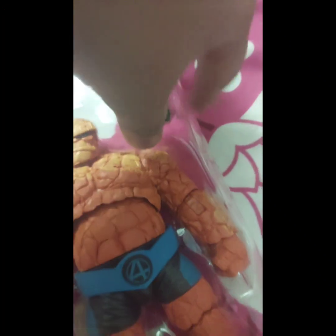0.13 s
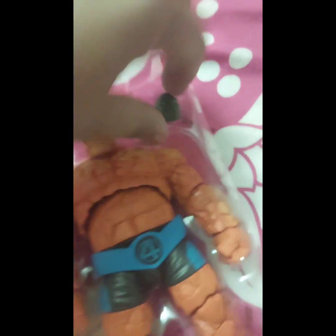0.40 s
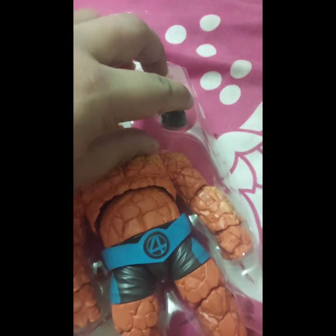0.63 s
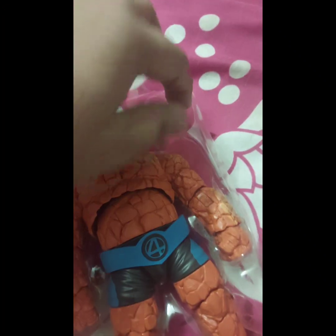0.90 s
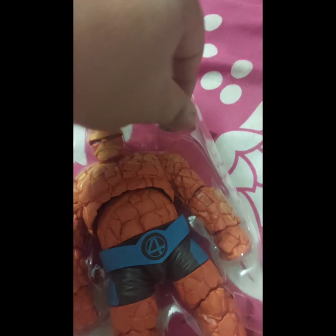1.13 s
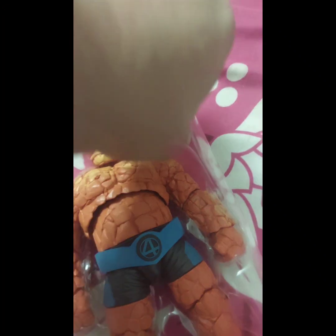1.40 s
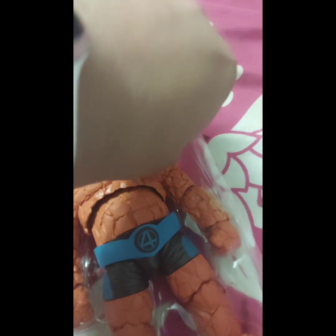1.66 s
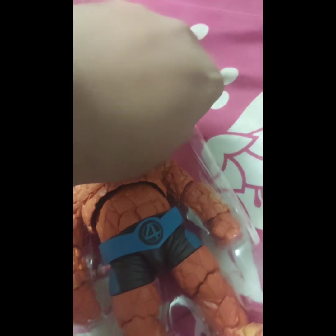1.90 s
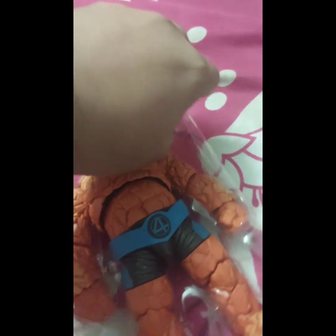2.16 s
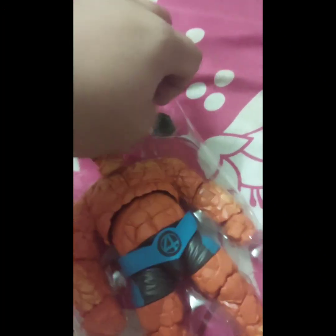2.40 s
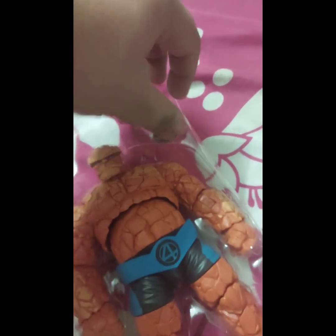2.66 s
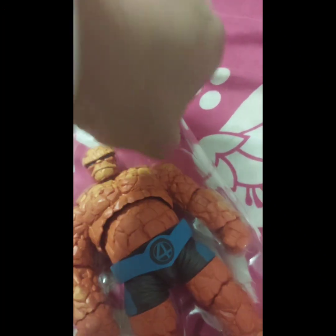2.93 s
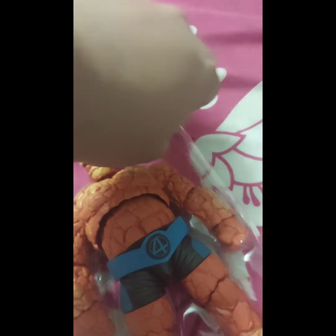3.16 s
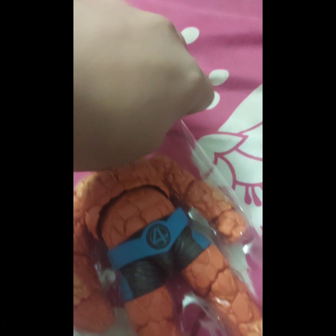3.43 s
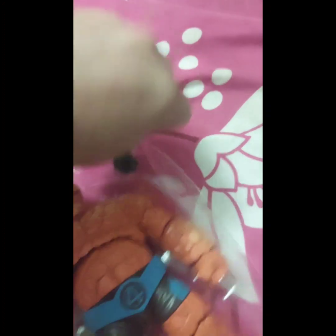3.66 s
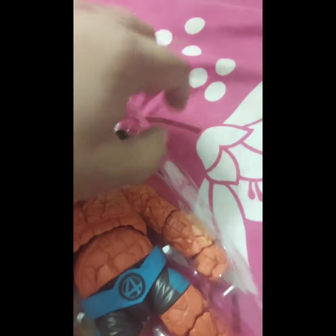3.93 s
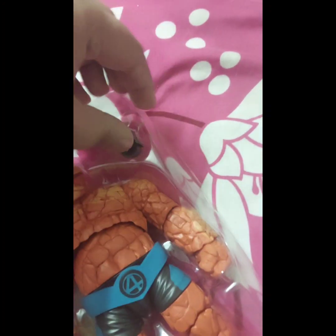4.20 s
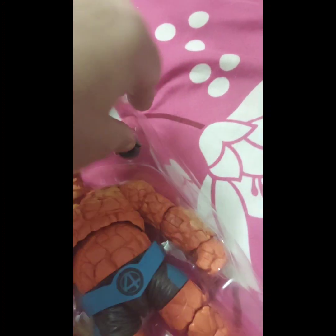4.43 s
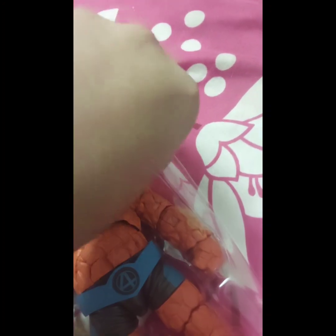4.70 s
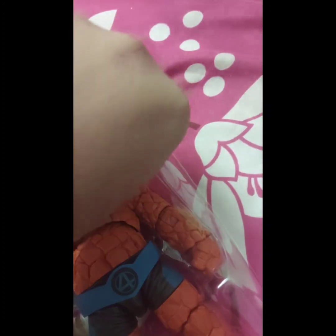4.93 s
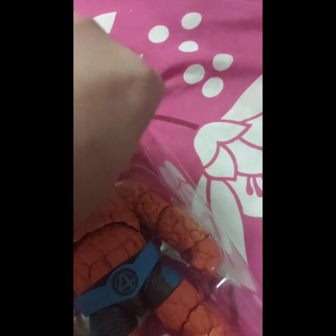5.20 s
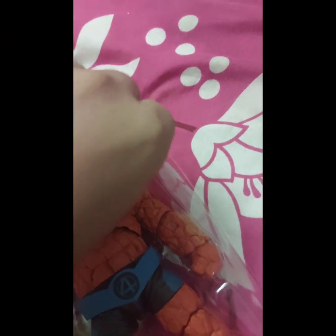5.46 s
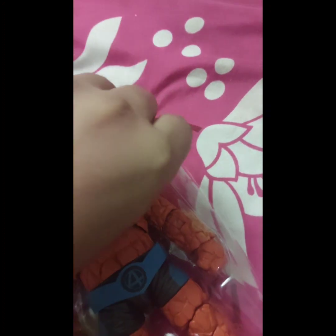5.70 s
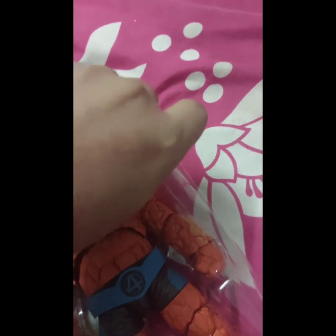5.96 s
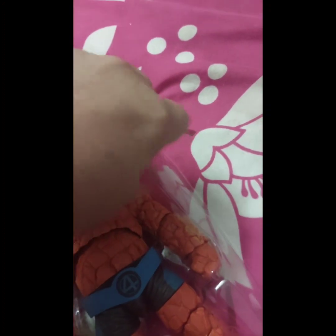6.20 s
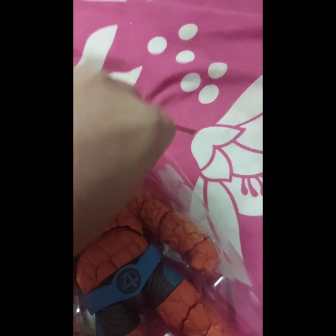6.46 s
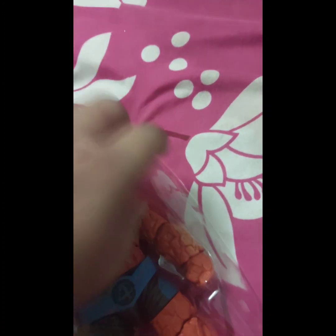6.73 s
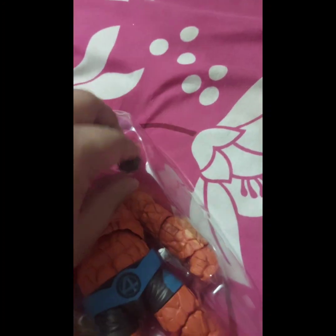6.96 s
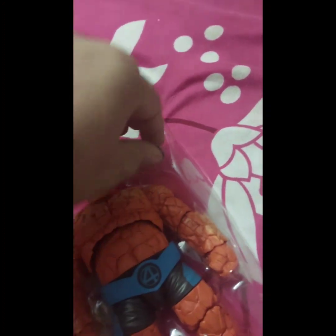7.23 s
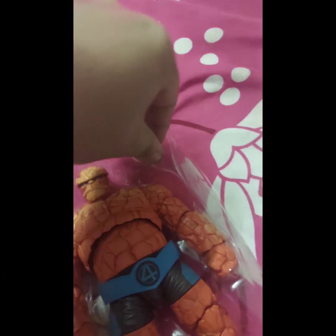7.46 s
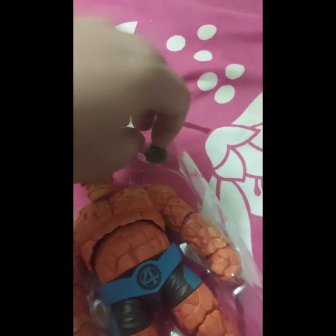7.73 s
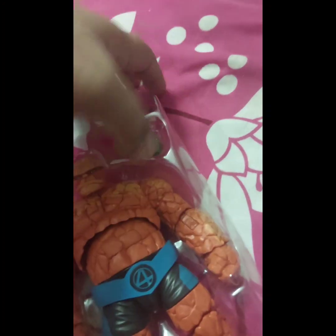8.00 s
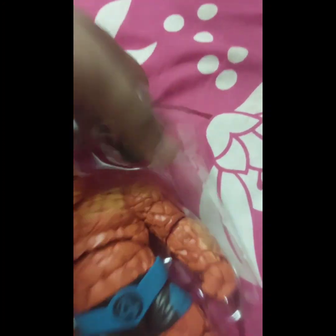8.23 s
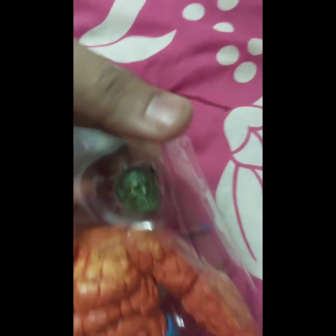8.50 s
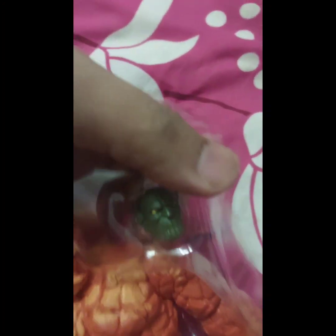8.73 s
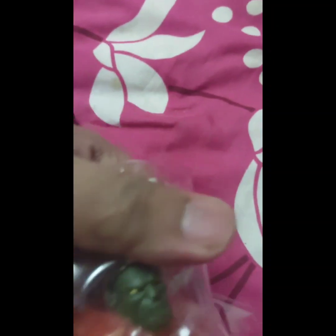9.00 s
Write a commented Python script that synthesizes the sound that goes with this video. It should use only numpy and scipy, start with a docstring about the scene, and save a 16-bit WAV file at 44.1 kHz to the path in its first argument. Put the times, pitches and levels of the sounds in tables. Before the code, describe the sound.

A close microphone in a small furnished room picks up fingers bending a thin plastic tray over about nine seconds. A sharp double snap opens, with lighter clicks and another pop at 0.6, then it is sparse until 1.4. From 1.4 to 2.4 comes a dense, loud run of hollow pops and bright cracks. A short creak rises around 2.9 to 3.0, followed by rapid crinkling until a strong snap at 3.7. From about 3.9 to 5.6 it is nearly quiet: soft room hum, low air puffs, a few faint ticks and a very faint far whine sinking between 4 and 5. Moderate crackling returns from 5.65 to 6.15, then scattered snaps, weak creaks after 7.3 and bright ticks near 7.7. A strong snap at 8.2 leads into duller, heavier crunches, loudest around 8.45 and 8.9 to 9.1. Room reflections are short.

```python
"""In a furnished room, fingers work a small part out of a thin plastic tray close to a small microphone.
The tray snaps, crunches and creaks (dying sines and noise bursts) over a finer random crackle.
Filtered noise makes the draught buffeting the microphone and the soft hum of the room.
A faint far whine, one wavering sine, sinks in pitch; echoes and a noise tail place the tray in the room."""
import sys
import numpy as np
from scipy import signal
from scipy.fft import rfft, irfft, next_fast_len
from scipy.io import wavfile
from scipy.ndimage import uniform_filter1d

SR = 44100
rng = np.random.default_rng(int(sys.argv[2]) if len(sys.argv) > 2 else 0)


def voltage_ratio(decibels):
    """Convert decibels (scalar or array-like) to amplitude ratios, 20 dB per decade."""
    exponent = np.asarray(decibels, float) / 20
    return 10 ** exponent


def to_wav(sig):
    """Store sig (one row per channel, or 1-D mono) as 16-bit WAV at the path in sys.argv[1].

    Samples outside -1..1 are clipped; the rate is SR.
    """
    pcm = np.clip(np.atleast_2d(sig), -1, 1) * 32767
    pcm = np.round(pcm).astype(np.int16)
    wavfile.write(sys.argv[1], SR, pcm.T)  # frames by channels


N = 402191  # length in samples, about 9.1 s

# Steady murmur of the room, spectrum shape: [pitch_hz, relative_level_db_per_hz]
HUM_SPECTRUM = [(100, -38), (160, 0), (315, -10.5), (475, 5), (650, -7.5), (1000, -2.5), (1900, -15),
                (3100, -25.5), (6000, -35), (10000, -35.5), (12500, -40.5), (16000, -71)]
# Air rushing over the microphone, spectrum shape: [pitch_hz, relative_level_db_per_hz]
DRAUGHT_SPECTRUM = [(12, -18), (20, -6), (75, -1.5), (244, -16), (393, -23.5), (440, -21), (484, -27),
                    (900, -37.5), (1170, -59), (1980, -120)]
# Puffs of air, each holding its level for its length: [start_s, length_s, level_db]
PUFFS = [(0.0, 0.03, -47), (0.187, 0.073, -45), (0.484, 0.062, -34), (0.689, 0.14, -27.5),
         (1.44, 0.32, -34.5), (1.94, 0.18, -42), (2.326, 0.13, -38.5), (2.962, 0.069, -40.5),
         (3.234, 0.19, -37.5), (3.708, 0.12, -43.5), (4.113, 0.064, -45.5), (4.476, 0.13, -34),
         (5.004, 0.11, -45.5), (5.385, 0.18, -40.5), (6.073, 0.14, -34.5), (6.326, 0.17, -33.5),
         (7.196, .44, -40), (7.753, 0.033, -37.5), (8.154, 0.095, -49), (8.603, 0.038, -40.5),
         (8.876, 0.091, -44.5)]
# Ringing of a buckling patch of tray: [multiple_of_patch_pitch, level_db, t60_s]
PATCH_MODES = [(.5, -3.5, 0.016), (.75, -9.5, 0.014), (1.01, 7.5, 0.011), (1.28, -12.5, 0.035),
               (1.62, -12, 0.027), (2.05, -23, 0.036)]
# Stiff rims of the tray; snap() plays them at 0.9 of this pitch: [table_pitch_hz, level_db, t60_s]
RIM_MODES = [(2586, 9, 0.0025), (3316, -0.5, 0.0036), (3574, -3, 0.008), (4136, -1, 0.0036)]
# Colour of the noise as a crease flips: [pitch_hz, level_db]
CRACK_SPECTRUM = [(4200, 1), (5800, 3), (7200, 5), (8800, 6), (10500, 2), (13000, -2), (15700, -2),
                  (16300, -43)]
# How hard the fingers knead; crackle() also fades both levels at rest:
# [time_s, dull_crackle_db, bright_crackle_db]
KNEADING = [(0.0, -53, -76), (1.3, -62.5, -76), (1.6, -52, -51), (1.85, -62.5, -66.5), (2.74, -38.5, -81.5),
            (2.94, -56, -63), (3.12, -75, -80), (3.68, -54, -67), (3.94, -62, -74.5), (5.61, -56.5, -78),
            (5.94, -57, -62), (6.32, -52, -77.5), (7.85, -56.5, -64.5), (7.97, -91, -101),
            (8.26, -37.5, -73), (8.43, -45, -75), (8.6, -40, -61), (8.75, -56, -78), (8.84, -48, -70),
            (9.12, -24.5, -80.5)]
# Single reflections from the nearest surfaces: [delay_s, level_db]
ECHOES = [(.0075, -19.5), (0.0137, -21), (0.022, -26)]
# How long the room tail lasts in each band: [pitch_hz, t60_s]
ROOM_DECAY = [(250, 0.48), (600, 0.16), (1400, 0.23), (3700, 0.29), (9700, 0.26), (15000, 0.39)]
# Colour of the room tail: [pitch_hz, level_db]
ROOM_COLOUR = [(250, 8.5), (1000, 0.5), (2500, 5.5), (6000, 8), (12000, 3)]
# Quick snaps of the tray, peak levels: [start_s, patch_pitch_hz, patch_db, crack_db]
SNAPS = [(.015, 1053, -12, -22.5), (.017, 1945, -13, -37), (0.127, 915, -27, -49),
         (.222, 1540, -30.5, -39.5), (.451, 1530, -31, -35), (0.471, 1190, -28, -42),
         (0.598, 1026, -15, -29.5), (1.231, 1100, -29, -38), (1.382, 1100, -32.5, -38.5),
         (1.424, 870, -25.5, -29), (1.447, 1070, -19, -32.5), (1.462, 1420, -20, -37),
         (1.48, 1100, -17, -27.5), (1.508, 1020, -24, -51), (1.514, 1130, -34, -31),
         (1.521, 1110, -15, -26.5), (1.546, 1110, -41, -28), (1.556, 1110, -9.5, -25),
         (1.579, 1230, -27, -31), (1.584, 1430, -14, -26), (1.603, 1336, -10.5, -23.5),
         (1.636, 1050, -13, -31), (1.642, 1360, -9, -25.5), (1.688, 1230, -8.5, -22.5),
         (1.724, 1250, -29, -37), (1.733, 1350, -3, -20.5), (1.767, 1490, -47, -33),
         (1.844, 1450, -27.5, -40.5), (1.901, 1466, -5.5, -18.5), (2.058, 1036, -12, -37),
         (2.078, 1287, -9.5, -14), (2.186, 930, -25, -30.5), (2.288, 1130, -37, -37),
         (2.301, 1504, -5.5, -19), (2.391, 860, -6, -11), (2.593, 1810, -25.5, -31), (2.68, 550, -43, -36),
         (2.814, 1290, -22.5, -18.5), (2.846, 1280, -11.5, -33), (2.895, 1350, -23.5, -39),
         (3.057, 1776, -7, -20.5), (3.074, 1290, -11, -23), (3.088, 1380, -9, -21), (3.114, 1280, -12, -22),
         (3.157, 1420, -16.5, -25.5), (3.203, 930, -18.5, -48), (3.228, 1156, -16, -22.5),
         (3.27, 1010, -25, -30.5), (3.284, 1030, -22, -36), (3.302, 1050, -24, -30.5),
         (3.352, 1554, -13, -27), (3.373, 1050, -22, -27.5), (3.409, 1410, -23, -64),
         (3.423, 997, -9.5, -32.5), (3.464, 1370, -41, -34), (3.472, 1330, -19.5, -24.5),
         (3.501, 1330, -26, -31), (3.52, 1302, -13.5, -31), (3.58, 1210, -27, -33), (3.609, 1330, -24, -31),
         (3.637, 1950, -24.5, -34.5), (3.687, 1600, -9, -21), (3.695, 1220, -1.5, -11.5),
         (3.746, 880, -15.5, -24.5), (3.832, 970, -16.5, -30.5), (4.487, 572, -49, -43.5),
         (4.501, 426, -43, -48), (4.868, 1060, -42, -54), (5.101, 875, -38, -41),
         (5.651, 1040, -16.5, -37.5), (5.683, 940, -27, -50), (5.706, 1130, -26, -50),
         (5.712, 1250, -18, -26), (5.745, 1310, -19, -29), (5.759, 1330, -35, -43), (5.775, 1225, -18, -42),
         (5.838, 950, -12.5, -27), (5.866, 1500, -17.5, -42), (5.877, 1270, -36, -37),
         (5.92, 1230, -27.5, -40), (5.968, 1310, -23.5, -34), (5.988, 1240, -24, -34),
         (6.002, 1380, -28, -48), (6.061, 1780, -17.5, -32.5), (6.079, 1410, -13, -28.5),
         (6.119, 1690, -13, -28.5), (6.326, 1750, -21, -29), (6.719, 1430, -14, -29),
         (6.728, 750, -15.5, -20.5), (6.866, 1000, -30, -39), (6.915, 930, -23, -32.5),
         (6.949, 380, -28.5, -58), (7.039, 474, -34, -38.5), (7.113, 1290, -32, -57),
         (7.192, 840, -28, -46), (7.226, 740, -32, -43), (7.365, 880, -30.5, -44), (7.535, 1170, -40, -54),
         (7.666, 1250, -20, -28.5), (7.786, 1560, -27, -33), (7.795, 920, -23.5, -34.5),
         (7.836, 900, -30, -44), (7.936, 980, -13, -34.5), (7.971, 850, -18, -30.5), (8.218, 1023, -8, -18),
         (8.291, 517, -26.5, -38), (8.465, 926, -5, -17), (8.539, 1110, -31, -30), (8.549, 1030, -28, -24),
         (8.817, 900, -28.5, -25), (8.834, 474, -26.5, -22.5), (8.988, 666, -28, -18),
         (8.999, 860, -18, -18), (9.086, 810, -10, -22.5)]
# Slow crunches, a crease tearing open, peak levels:
# [start_s, length_ms, patch_pitch_hz, patch_db, crack_db]
CRUNCHES = [(0.398, 28, 640, -31.5, -40), (.421, 7.3, 1100, -25.5, -41), (.935, 9.4, 906, -25.5, -42.5),
            (1.249, 11.7, 1180, -30, -37), (1.914, 12, 2240, -23.5, -52), (2.033, 7.3, 515, -28, -39.5),
            (2.328, 9.7, 884, -9, -21), (2.409, 26, 1080, -13, -18.5), (2.541, 9, 1360, -31.5, -42.5),
            (2.745, 6.76, 956, -11, -25.5), (3.711, 21.7, 1340, -16.5, -30), (3.722, 12.2, 1100, -15, -52),
            (3.772, 12, 1000, -18.5, -30), (6.096, 15, 1280, -16, -35), (6.137, 11.2, 1220, -16, -31),
            (6.649, 4.8, 1050, -21, -28.5), (6.764, 6.6, 1030, -22, -29.5), (6.895, 14.4, 1360, -26, -38),
            (7.632, 5.9, 1278, -25.5, -39), (8.334, 9.1, 960, -22.5, -44), (8.405, 8.2, 800, -26.5, -47),
            (8.444, 15, 587, -25, -32), (8.456, 9, 810, -14, -26.5), (8.475, 18.4, 895, -14.5, -30.5),
            (8.593, 9.2, 1800, -29, -29.5), (8.619, 22, 970, -26, -31.5), (8.676, 26, 797, -21, -45),
            (8.865, 16.3, 805, -14.5, -26.5), (8.883, 8, 900, -25, -32), (8.915, 10.2, 630, -14, -19),
            (8.948, 10.6, 750, -6.5, -18.5), (9.028, 7.1, 748, -7, -21)]
# Bright ticks of the film alone, no patch, peak level: [start_s, crack_db]
TICKS = [(.393, -43), (.577, -38), (0.916, -47), (1.258, -40), (1.372, -41), (2.958, -30), (4.475, -47),
         (4.768, -46), (5.115, -37.5), (5.815, -43), (5.898, -35), (6.027, -36), (7.586, -44), (7.65, -28),
         (7.681, -23.5), (7.701, -26.5), (8.379, -42), (8.392, -34), (8.413, -42), (8.686, -29.5),
         (8.73, -31.5), (8.801, -25.5), (8.974, -17.5)]
# Where the tray is gripped sets how the rims join in; the favoured pitch is on the RIM_MODES scale:
# [time_s, rim_over_crack_db, favoured_rim_pitch_hz]
GRIP = [(0.0, -4.5, 2670), (1.45, -5.5, 2530), (1.55, 10, 2450), (2.4, 4, 2920), (2.85, -0.5, 3400),
        (3.6, 4.5, 3060), (5.7, -1, 3300), (6.14, 1, 3440), (6.33, 6.5, 3320), (6.65, 1.5, 2940),
        (7.95, -1.5, 3000), (8.3, -1.5, 4070), (8.75, -7, 3320), (9.12, 5.5, 2620)]
# Creaks, the part rubbing step by step along its pocket:
# [first_step_s, last_step_s, steps_per_s, patch_pitch_hz, first_patch_db, last_patch_db, rim_over_patch_db]
CREAKS = [(2.915, 3.033, 97, 1280, -28, -12, -11), (3.534, 3.556, 83, 1400, -15.5, -32, -6),
          (5.929, 5.956, 120, 1278, -30, -29.5, -12), (7.33, 7.354, 80, 1530, -44, -38.5, -14),
          (7.556, 7.607, 57, 1490, -37.5, -34.5, -21), (7.72, 7.762, 52, 1750, -32, -39, -3)]
# Far whine, sinking in uneven steps: [time_s, pitch_hz, level_db]
WHINE = [(4.02, 776, -74), (4.07, 775, -56), (4.14, 772, -61), (4.19, 746, -63), (4.44, 742, -61),
         (4.55, 716, -70), (4.75, 712, -61.5), (4.9, 709, -61), (5.0, 706, -74)]

HUM_DB = -54
CALM_DB, PUFF_RISE_DB_PER_S, PUFF_FALL_DB_PER_S = -53.5, 167, 211
RIM_FALL_DB_PER_OCTAVE = 13.5  # how fast rims fade away from the favoured pitch
ROOM_DB, ROOM_GAP_S = -13, 0.0064  # level of the tail; time before the walls answer
SNAP_MS, SNAP_SPREAD = 4.3, .25  # time a quick crease takes to let go; its relative scatter
CREAK_UNEVEN_DB, CREAK_JITTER_S, CREAK_DETUNE = 1.8, .0005, .02  # scatter from step to step
CREAK_STEP_MS, CREAK_CRACK_DB = 3.2, -10.5  # time a step takes; crack relative to the patch
CEILING = .93  # amplitude that rounded peaks approach
PORT_HZ, EDGE_HZ = 36.8, 16150  # low cut of the microphone; upper band limit


def evened(x):
    """Scales a sound to rms 1."""
    return x / np.sqrt(np.mean(x ** 2) + 1e-20)


def read(points, hz):
    """Reads a table over pitch, with straight lines on a log-frequency axis."""
    f, value = np.transpose(points)
    return np.interp(np.log(hz + 1), np.log(f + 1), value)


def coloured(x, points):
    """Filters a sound by a spectrum given in dB."""
    size = next_fast_len(len(x))
    gain = voltage_ratio(read(points, np.fft.rfftfreq(size, 1 / SR)))
    return irfft(rfft(x, size) * gain, size)[:len(x)]


def curve(rows):
    """Turns the columns of a timed table into values for every sample."""
    s, *columns = np.transpose(rows)
    return [np.interp(np.arange(N) / SR, s, c) for c in columns]


def drift(samples):
    """Slow random wandering of rms 1: noise averaged twice."""
    once = uniform_filter1d(rng.standard_normal(N), samples)
    return evened(uniform_filter1d(once, samples))


def hum():
    """The steady murmur of the room: coloured noise with a slight swell."""
    level_db = HUM_DB + 1.03 * drift(5000)
    return voltage_ratio(level_db) * evened(coloured(rng.standard_normal(N), HUM_SPECTRUM))


def puffs():
    """Level of the draught: calm air, and puffs that swell, hold and die away."""
    t = np.arange(0, N + 256, 256) / SR
    start, length, db = np.transpose(PUFFS)[..., None]
    rise_db = PUFF_RISE_DB_PER_S * np.maximum(start - t, 0)
    fall_db = PUFF_FALL_DB_PER_S * np.maximum(t - start - length, 0)
    power = voltage_ratio(2 * CALM_DB) + voltage_ratio(2 * (db - rise_db - fall_db)).sum(0)
    return np.interp(np.arange(N) / SR, t, np.sqrt(power))


def draught(lumpy_db=3.5):
    """Low turbulence at the microphone port, in lumps of a few hundredths of a second."""
    lumpy = rng.standard_normal(N) * voltage_ratio(lumpy_db * drift(900))
    # the added last point keeps the spectrum flat above 1500 Hz
    air = evened(coloured(lumpy, DRAUGHT_SPECTRUM + [(1500, -70.5)]))
    return puffs() * air


def ring(modes, scale, detune=.025, spread_db=1.5):
    """Ringing plastic: dying sines with a soft start, each a little off its pitch and level."""
    t = np.arange(1024) / SR
    hz, db, t60 = np.transpose(modes)[..., None]
    off, level = rng.standard_normal((2, len(modes), 1))
    sign = (-1.) ** np.arange(len(modes))[:, None]  # neighbouring modes start opposed
    size = sign * voltage_ratio(db + spread_db * level - 60 * t / t60)
    tones = size * np.sin(2 * np.pi * hz * scale * (1 + detune * off) * t)
    soft_start = (1 - np.exp(-t * hz.mean() * scale * 2.2)) ** 2
    return tones.sum(0) * soft_start


def crack(t60=0.011):
    """A brief bright burst of noise as the crease flips."""
    t = np.arange(1024) / SR
    noise = coloured(rng.standard_normal(1024), CRACK_SPECTRUM)
    return noise * voltage_ratio(-60 * t / t60) * (1 - np.exp(-t / .0005))


def slips(ms, sound, db, ring_ms=2.4, fade_db=9, later=.12, drawn_ms=8.5, count=9):
    """A crease lets go in uneven slips: a quick one mostly at once, a slow one in a flurry; db is the peak."""
    when, size = rng.random((2, count))
    slowness = (ms / drawn_ms) ** 2
    size = min(later + slowness, 1) * (2 * size - 1) * voltage_ratio(-fade_db * when)
    when[0], size[0] = 0, np.exp(-slowness)  # the first slip
    span_ms = min(max(ms - ring_ms, .2), 20)  # leaves time for the ringing
    train = np.zeros(1024)
    np.add.at(train, (when * span_ms * SR / 1000).astype(int), size)
    out = np.convolve(train, sound)
    return voltage_ratio(db) * out / abs(out).max()


def snap(hz, patch_db, rim_db, crack_db, ms, rim_hz=3000):
    """One buckle: the patch rings, the rims tick and the crease cracks."""
    rims = [(f, db - RIM_FALL_DB_PER_OCTAVE * abs(np.log2(f / rim_hz)), t60) for f, db, t60 in RIM_MODES]
    patch = slips(ms, ring(PATCH_MODES, hz), patch_db)
    rim = slips(ms, ring(rims, 0.9), rim_db)
    return patch + rim + slips(ms, crack(), crack_db)


def crackle(per_s=260, spread_db=6.5, rest_db=-82, count=16):
    """Many tiny buckles at random, dull and bright ones following the kneading."""
    dull, bright = np.zeros((2, N))
    for hz in np.geomspace(650, 1900, count):
        hits = rng.random((2, N)) < per_s / count / SR
        strength = voltage_ratio(spread_db * np.minimum(rng.exponential(1, (2, N)), 3))
        dull_train, bright_train = hits * strength
        dull += signal.oaconvolve(dull_train, snap(hz, 0, -29.0, -51, 3.18))[:N]
        bright += signal.oaconvolve(bright_train, crack(t60=0.025))[:N]
    dull_db, bright_db = curve(KNEADING)
    busy = np.clip((bright_db - rest_db) / 10, 0, 1)  # resting fingers leave the film silent
    return busy * (voltage_ratio(dull_db) * evened(dull) + voltage_ratio(bright_db) * evened(bright))


def room(x):
    """Diffuse echoes: the walls hear the tray from all sides, so only its broad colour returns as noise."""
    hz, t, z = signal.stft(x, SR, nperseg=256, noverlap=192)
    narrow, broad = (uniform_filter1d(abs(z) ** 2, size=size, axis=0) for size in (3, 13))
    power = np.where(hz[:, None] < 4500, narrow, broad)
    lag = t[:400]
    # near things answer weakly, the walls later; each band dies at its own speed
    onset = np.clip(lag / ROOM_GAP_S, 0, 1) ** 3
    shape = (onset * voltage_ratio(-60 * lag / read(ROOM_DECAY, hz)[:, None])) ** 2
    shape = shape / shape.sum(1, keepdims=True)
    tail_power = abs(signal.fftconvolve(power, shape, axes=1)[:, :len(t)])
    tail = np.sqrt(tail_power) * voltage_ratio(read(ROOM_COLOUR, hz))[:, None]
    noise = signal.stft(rng.standard_normal(N), SR, nperseg=256, noverlap=192)[2]
    noise = noise / np.sqrt(np.mean(abs(noise) ** 2))
    return signal.istft(tail * noise, SR, nperseg=256, noverlap=192)[1][:N]


def echoes(x):
    """Single reflections from the nearest surfaces: delayed, weaker copies."""
    taps = np.zeros(2048)
    for s, db in ECHOES:
        taps[round(s * SR)] = voltage_ratio(db)
    return signal.oaconvolve(x, taps)[:N]


def snaps():
    """The distinct snaps, crunches and ticks: creases buckling quickly, slowly, or in the film alone."""
    quick = [(s, SNAP_MS * np.exp(SNAP_SPREAD * rng.standard_normal()), *row) for s, *row in SNAPS]
    out, grip = np.zeros(N + 2048), np.array(curve(GRIP))
    for s, ms, hz, patch_db, crack_db in quick + CRUNCHES:
        at = round(s * SR)
        over_db, rim_hz = grip[:, at]
        out[at:][:2047] += snap(hz, patch_db, crack_db + over_db, crack_db, ms, rim_hz)
    for s, crack_db in TICKS:
        out[round(s * SR):][:2047] += slips(SNAP_MS, crack(), crack_db)
    return out[:N]


def creaks():
    """Nearly even steps of stick and slip, each ringing much the same patch and rims."""
    out, rim_hz = np.zeros(N + 2048), curve(GRIP)[1]
    for first, last, per_s, hz, first_db, last_db, rim_db in CREAKS:
        for s in np.arange(first, last + .5 / per_s, 1 / per_s):
            late, uneven, off = rng.standard_normal(3)
            db = np.interp(s, [first, last], [first_db, last_db]) + CREAK_UNEVEN_DB * uneven
            at = round((s + CREAK_JITTER_S * late) * SR)
            step_hz = hz * (1 + CREAK_DETUNE * off)
            step = snap(step_hz, db, db + rim_db, db + CREAK_CRACK_DB, CREAK_STEP_MS, rim_hz[at])
            out[at:][:2047] += step
    return out[:N]


def whine():
    """A faint far tone: one sine that sinks in pitch and wavers in level."""
    hz, db = curve(WHINE)
    t = np.arange(N) / SR
    waver = evened(uniform_filter1d(rng.standard_normal(N), 2500))
    on = (t > WHINE[0][0]) & (t < WHINE[-1][0])
    tone = np.sqrt(2) * np.sin(2 * np.pi * np.cumsum(hz) / SR)  # rms 1
    return on * voltage_ratio(db + 2 * waver) * tone


def scene():
    """Tray in the room, hum, draught and whine, heard by one microphone on two equal channels."""
    tray = snaps() + creaks() + crackle()
    heard = tray + echoes(tray) + voltage_ratio(ROOM_DB) * room(tray)
    mix = heard + hum() + draught() + whine()
    return np.array([mix, mix])


def roll_off(x):
    """The treble ends steeply here."""
    return signal.sosfilt(signal.butter(12, 16990, fs=SR, output="sos"), x)


def record(dry):
    """The microphone drops the deepest rumble, its input rounds off the highest peaks, the top is cut."""
    low_cut = signal.butter(3, PORT_HZ, "high", fs=SR, output="sos")
    cut = signal.sosfilt(low_cut, dry)
    rounded = CEILING * np.tanh(cut / CEILING)
    limited = signal.oaconvolve(rounded, signal.firwin(255, EDGE_HZ, fs=SR)[None], "same")
    return roll_off(limited)


dry = scene()
out = record(dry)
to_wav(out)
```